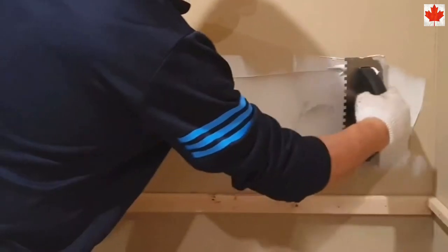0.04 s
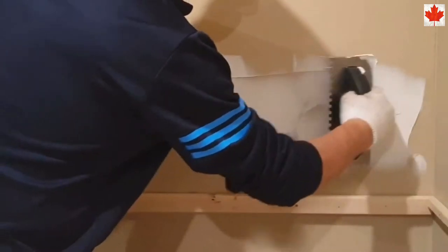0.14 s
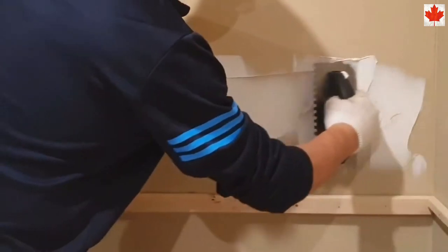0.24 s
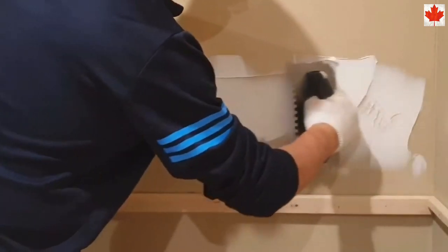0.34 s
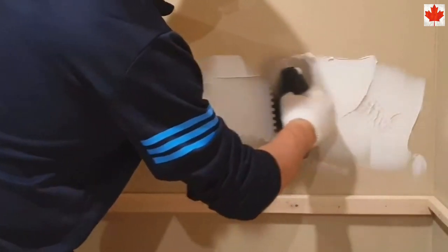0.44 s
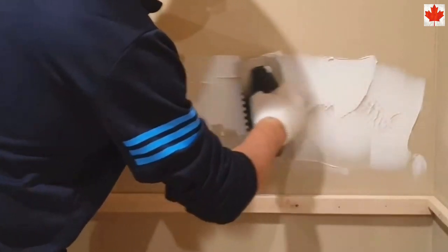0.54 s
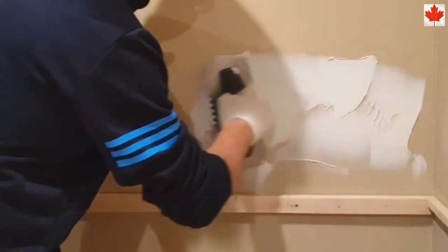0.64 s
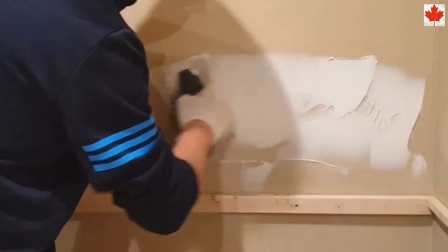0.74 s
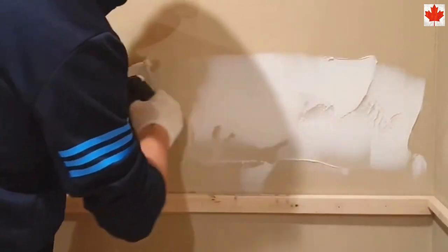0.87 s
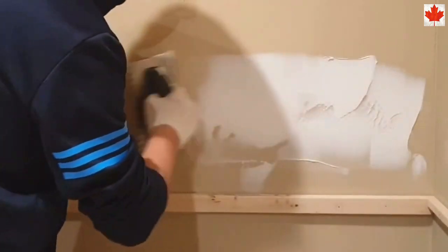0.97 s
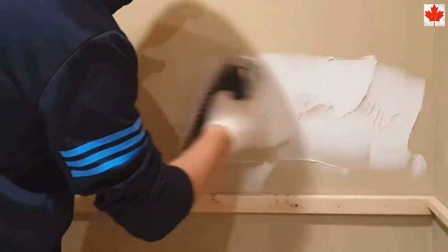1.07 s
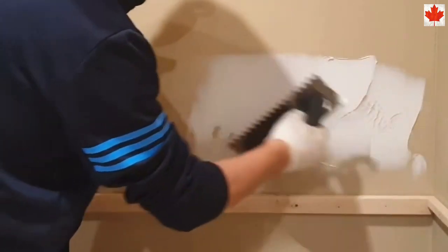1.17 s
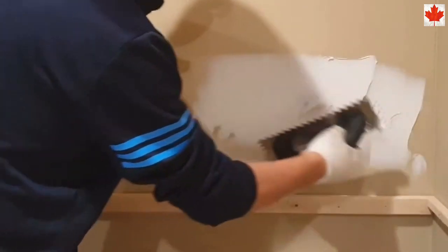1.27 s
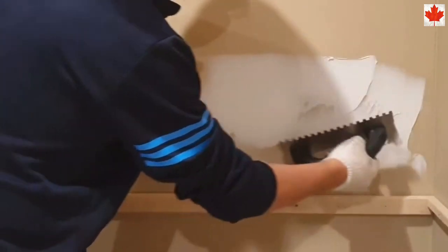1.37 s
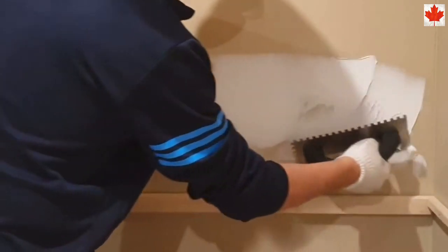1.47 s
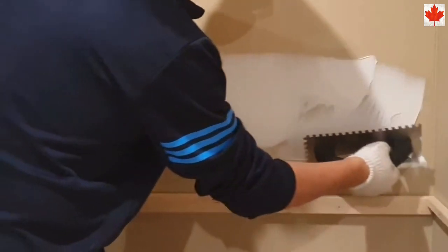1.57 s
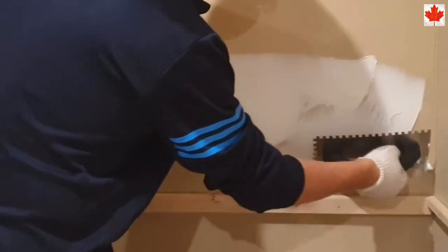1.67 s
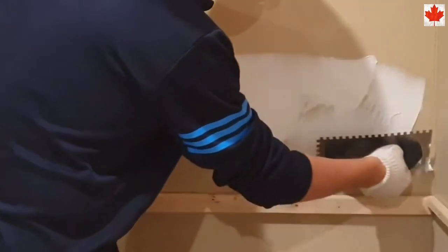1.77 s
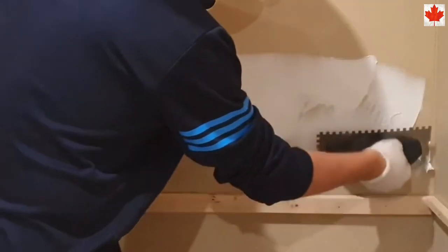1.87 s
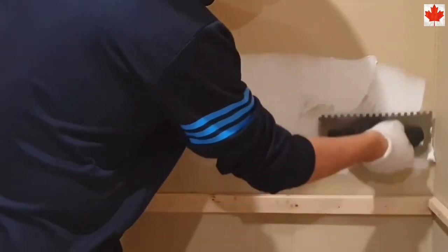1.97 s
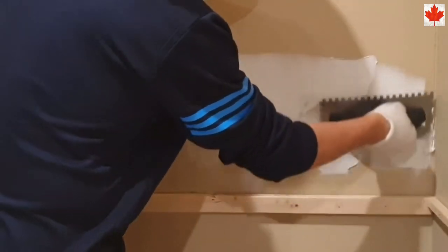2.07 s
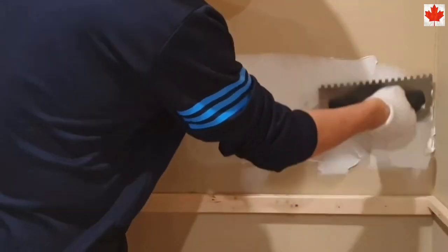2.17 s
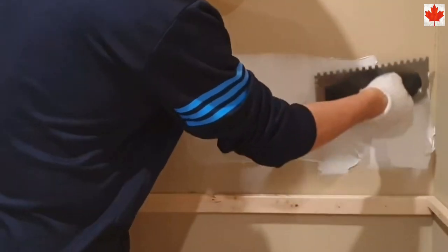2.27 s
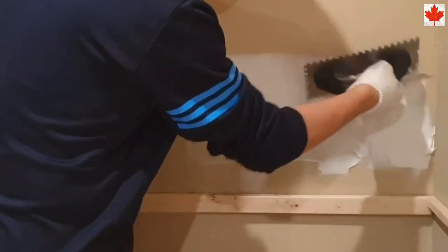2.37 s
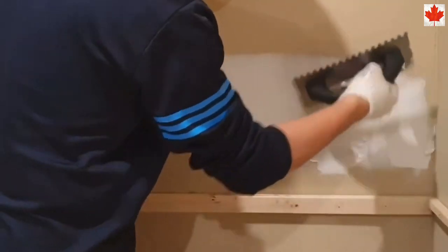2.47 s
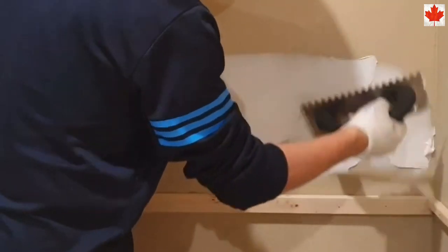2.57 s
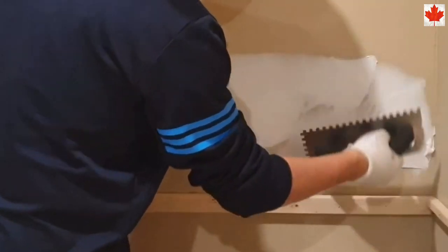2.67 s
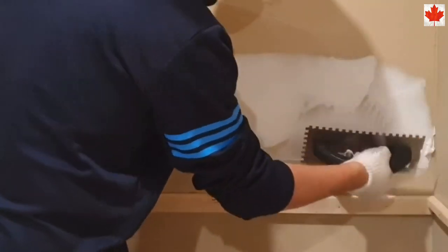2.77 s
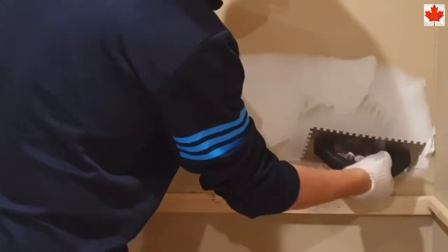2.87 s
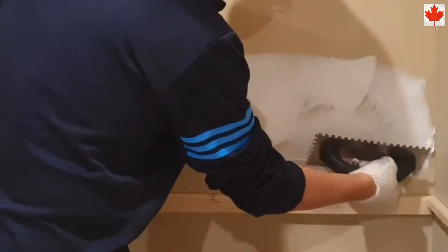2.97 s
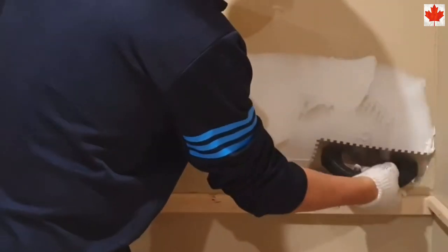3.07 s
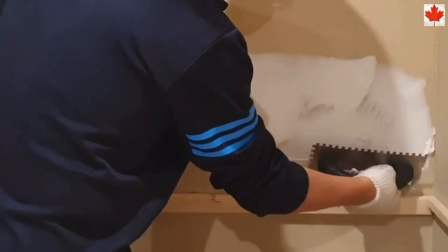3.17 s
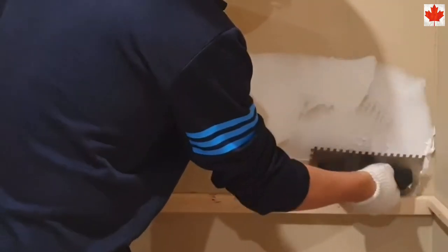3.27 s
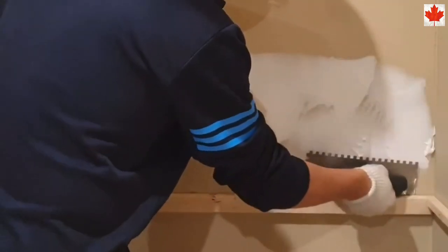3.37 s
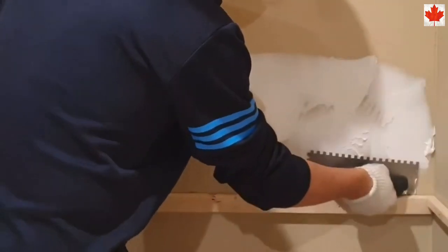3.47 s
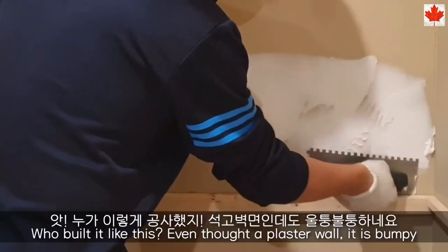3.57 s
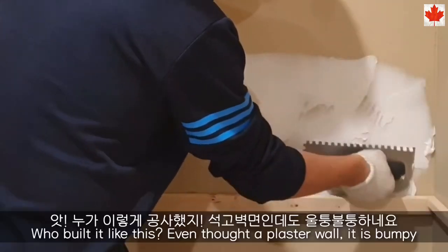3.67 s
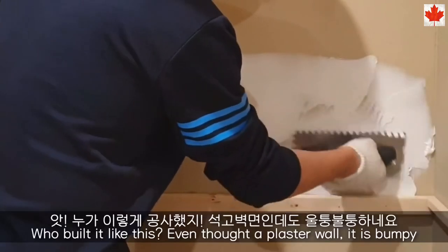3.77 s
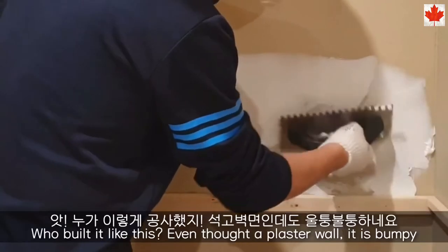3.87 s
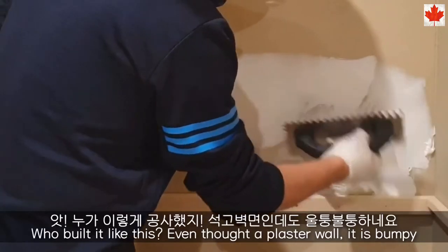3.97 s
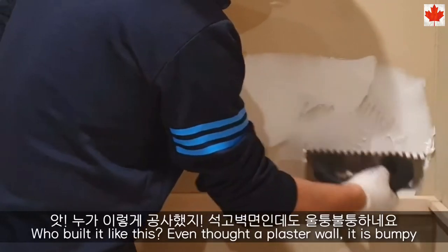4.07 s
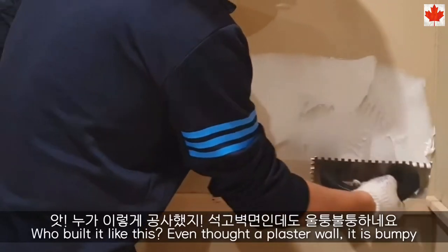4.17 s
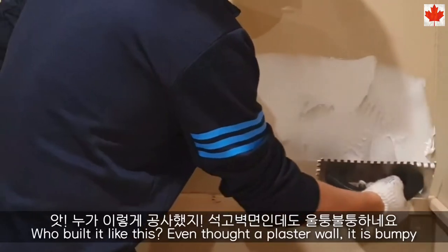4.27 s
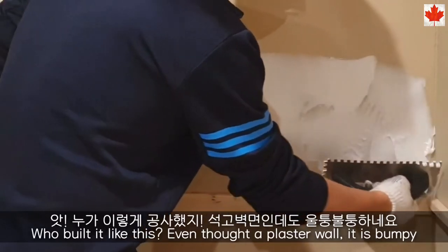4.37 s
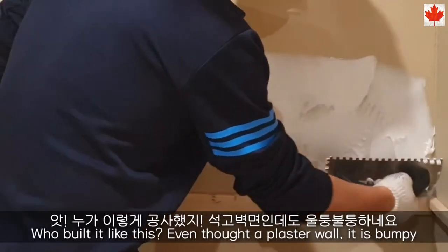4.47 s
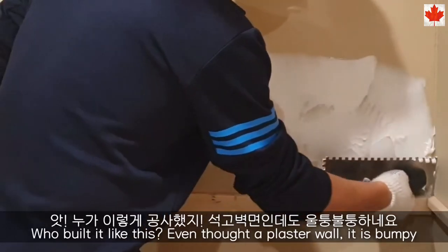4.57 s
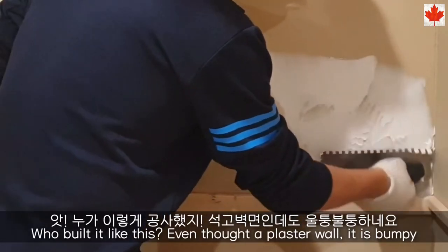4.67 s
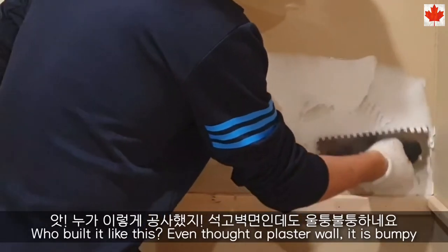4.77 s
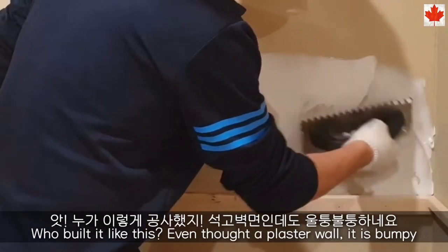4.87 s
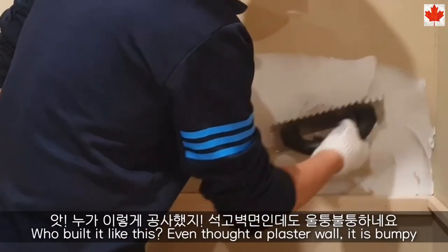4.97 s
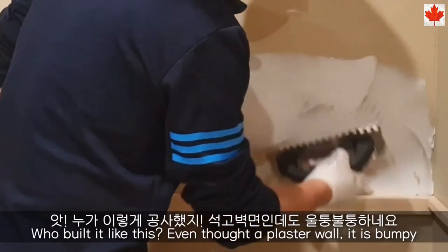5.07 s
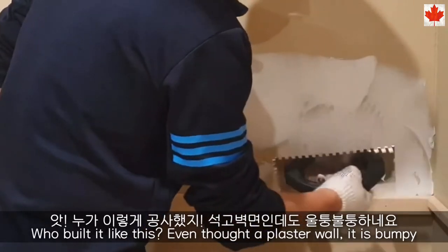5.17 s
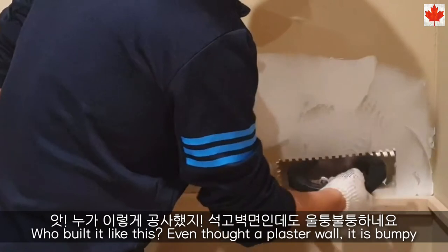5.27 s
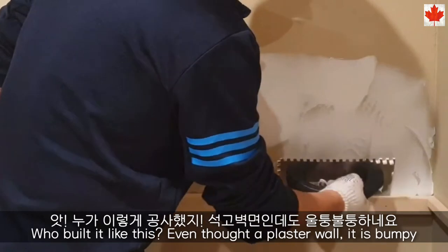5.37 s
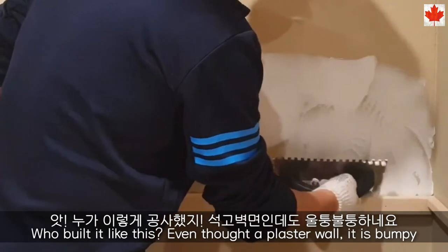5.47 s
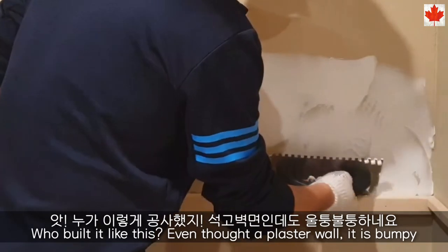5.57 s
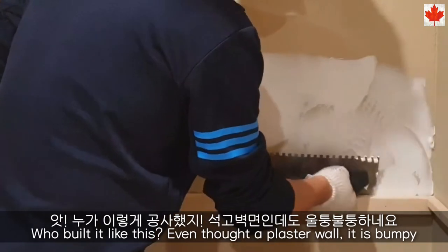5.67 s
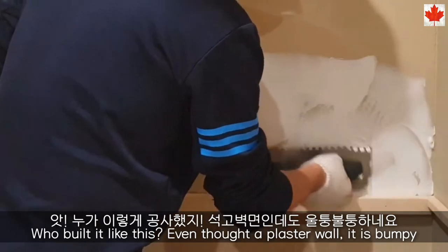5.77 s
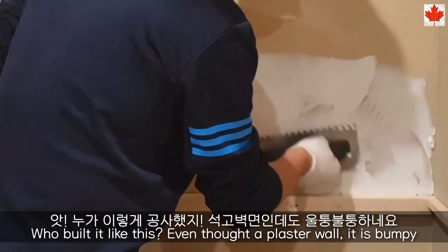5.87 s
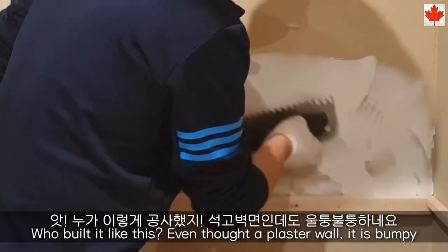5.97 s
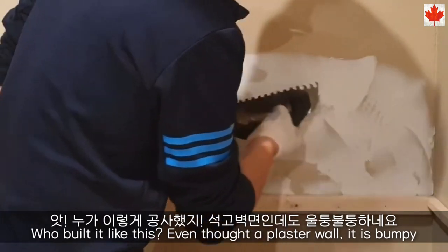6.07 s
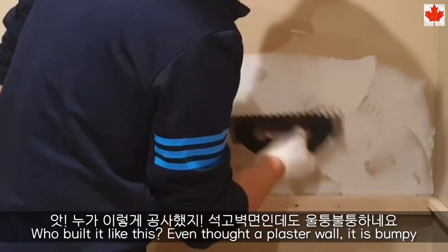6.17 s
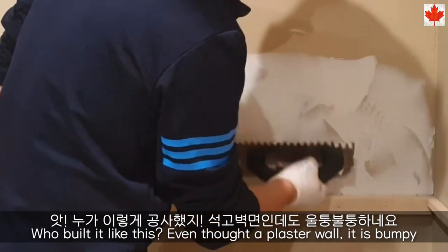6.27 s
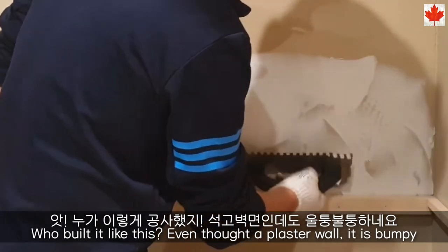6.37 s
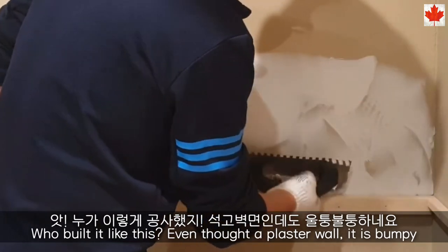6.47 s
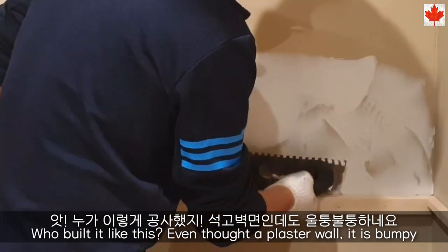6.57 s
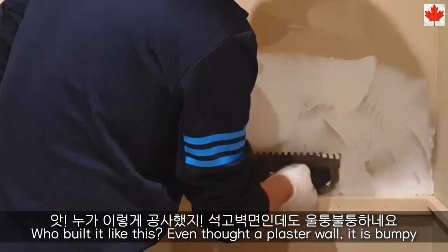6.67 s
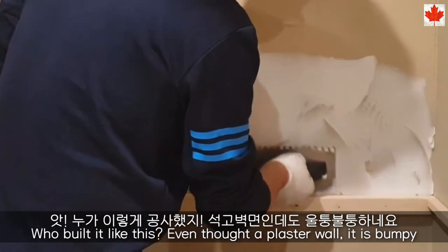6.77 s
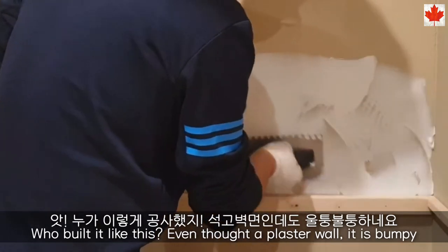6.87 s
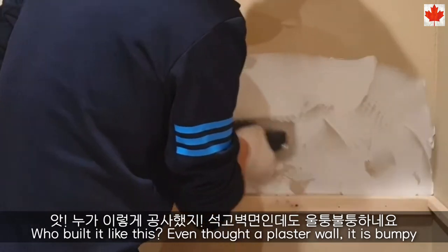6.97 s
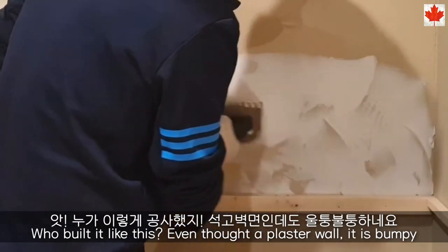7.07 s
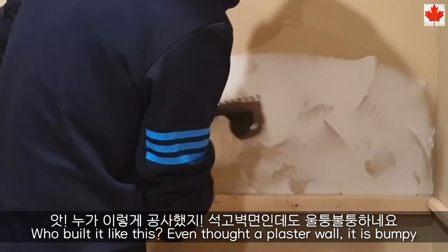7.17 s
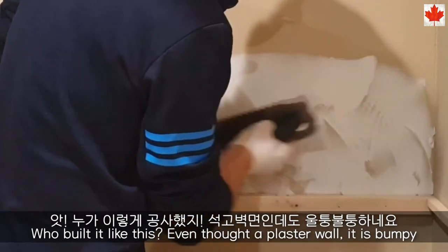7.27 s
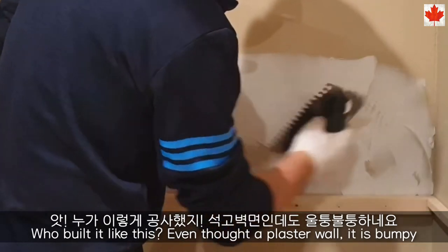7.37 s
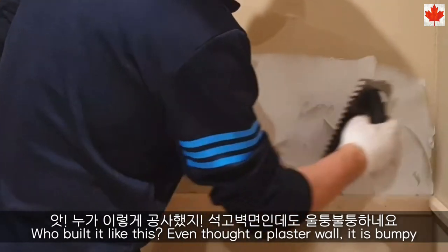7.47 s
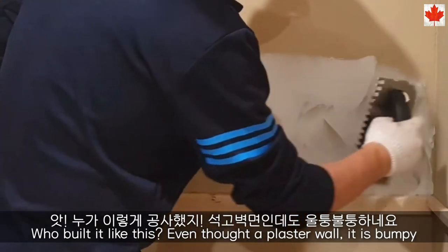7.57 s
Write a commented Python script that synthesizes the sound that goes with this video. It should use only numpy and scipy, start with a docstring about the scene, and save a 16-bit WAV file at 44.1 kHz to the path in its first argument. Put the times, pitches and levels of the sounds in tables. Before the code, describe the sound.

A metal blade lands, scrapes and peels off a wall coated with thick adhesive. Fizzy, sandy hiss mixes with a hollow mid-pitched steel rasp. Irregular bumps rattle the teeth and make the board thump deeply, strongest around the middle and later on. Tiny grain snaps and faint squeaks appear between strokes. Stereo microphones nearby catch short, bright indoor reflections and a quiet electrical hum.

```python
"""Trowel on a hollow wall

A notched steel trowel spreads thick adhesive over a bumpy plasterboard wall in a small room with mains hum.
Random clicks, shaped by filters, make the landing knocks, the hiss of gritty paste and the rasp of the edge.
On bumps the teeth judder: uneven slips ring the notes of the hollow wall, and filtered noise makes it boom.
Twice the steel squeaks faintly (narrow bands of noise), and now and then a hard grain snaps."""
import sys
import numpy as np
from scipy import signal
from scipy.fft import rfft, irfft, next_fast_len
from scipy.io import wavfile
from scipy.ndimage import uniform_filter1d

SR = 44100
rng = np.random.default_rng(int(sys.argv[2]) if len(sys.argv) > 2 else 0)


def unload_wav(signal):
    """Save mono or channel-first audio to the path in sys.argv[1] as 16-bit WAV at rate SR, clipped to [-1, 1]."""
    wavfile.write(
        sys.argv[1],
        SR,
        np.round(np.clip(np.atleast_2d(signal).T, -1, 1) * 32767).astype(np.int16),
    )


N = 336483
TIME = np.arange(N) / SR
AFTER = np.arange(SR) / SR  # seconds since a movement began
SIZE = next_fast_len(N + SR)  # room for filter tails
HZ = np.fft.rfftfreq(2 * (SIZE // 2), 1 / SR)


def amp(db):
    """Turns decibels into gain."""
    return 10 ** (np.asarray(db) / 20)


def unit(x):
    """Scales to an average (rms) size of 1."""
    return x / np.sqrt(np.mean(abs(x) ** 2) + 1e-20)


def read(points, hz=HZ):
    """Joins (frequency, value) points by straight lines on a log-frequency axis."""
    f, value = np.transpose(points)
    return np.interp(np.log(hz + 1), np.log(f), value)


def colour(points):
    """Builds a filter with the given dB outline that never sounds before its input."""
    cepstrum = irfft(np.log(amp(read(points))))
    half = len(cepstrum) // 2
    causal = np.r_[cepstrum[0], 2 * cepstrum[1:half], np.zeros(half)]
    return np.exp(rfft(causal))


def modes(rows):
    """Builds a filter from resonances, the notes at which an object likes to ring."""
    return sum(amp(db) * 1j * HZ * width / (hz ** 2 - HZ ** 2 + 1j * HZ * width)
               for hz, width, db in rows)


def through(x, response):
    """Passes a sound through a filter."""
    return irfft(rfft(x, 2 * (len(HZ) - 1)) * response)[..., :N]


def resonate(x, hz, width_hz):
    """A resonance of gain 1 whose note follows the curve hz."""
    turn = np.exp(2j * np.pi * np.cumsum(hz * np.ones(N)) / SR)
    r = np.exp(-np.pi * width_hz / SR)
    # shift the note down to zero, smooth, and shift back up
    smooth = signal.lfilter([1 - r], [1, -r], x / turn + 1e-18)
    return 2 * (turn * smooth).real


def wander(rate_hz):
    """A slow random curve of rms 1."""
    return unit(through(rng.standard_normal(N), 1 / (1 + (HZ / rate_hz) ** 4)))


def grains(per_s, spread_db):
    """Random clicks of either sign; a larger spread makes their sizes more uneven."""
    size = amp(spread_db * np.minimum(rng.exponential(1, N), 4))
    signed = size * rng.choice([-1, 1], N)
    return unit(signed * (rng.random(N) < per_s / SR))


def add(track, s, shape):
    """Adds a shape to a track from time s."""
    part = track[max(round(s * SR), 0):][:len(shape)]
    part += shape[:len(part)]


def envelope(attack_s, length_s, release_db_per_s, curve=1):
    """Attack, hold until length_s, then a steady fade in dB."""
    rise = np.minimum(AFTER / attack_s, 1) ** curve
    return rise * amp(-release_db_per_s * np.maximum(AFTER - length_s, 0))


# how alike left and right are in diffuse sound: (frequency [Hz], likeness [-1 to 1])
LEFT_RIGHT_LIKENESS = [(50, 0.59), (150, -0.41), (300, -0.63), (600, 0.29), (1200, -0.19), (3000, 0.0028),
                       (16000, 0.14)]


def pair(x):
    """Blends two unrelated signals into sound from all around, its left-right likeness set by frequency."""
    # alike in the deepest bass, partly opposite from about 150 to 300 Hz, mostly unrelated in the treble
    same = np.clip(read(LEFT_RIGHT_LIKENESS), -1, 1)
    common = through(x[0], np.sqrt((1 + same) / 2))
    apart = through(x[1], np.sqrt((1 - same) / 2))
    return np.array([common + apart, common - apart])


# colour of the still room: (frequency [Hz], relative level [dB])
ROOM_AIR = [(20, -34), (40, -12), (58, 0.5), (85, -3), (130, -16.5), (200, -11.5), (400, -22), (800, -28),
            (2500, -31), (6000, -33.5), (9000, -37.5), (13000, -30), (16000, -32.5)]
# steady mains hum: (frequency [Hz], level [dB])
MAINS_HUM = [(60, -79), (120, -62.5)]


def background(air_db=-70):
    """Low rumble and hiss of the room as filtered noise, with a steady mains hum of pure tones."""
    air = unit(through(pair(rng.standard_normal((2, N))), amp(read(ROOM_AIR))))
    hum = sum(amp(db) * np.sin(2 * np.pi * (hz * TIME + rng.random())) for hz, db in MAINS_HUM)
    return amp(air_db) * air + hum


# the teeth ride over a bump in the wall, levels before each sound's own gain:
# (start time [s], length [s], judder of the teeth [dB], thud of the board [dB], drumming of the hollow [dB])
WALL_BUMPS = [ (0.188, 0.022, -50.5, -41.5, -61.5), (0.232, 0.0077, -60, -47.5, -64),
              (0.281, 0.023, -49, -55.5, -61.5), (0.8, 0.046, -60, -63.5, -66.5),
              (0.931, 0.018, -49, -51.5, -60), (1.218, 0.022, -88, -61.5, -69.5),
              (1.656, 0.041, -69, -58.5, -71), (1.83, 0.071, -61.5, -48.5, -74),
              (2.227, 0.051, -66, -72, -85), (2.39, 0.013, -71, -73, -59), (3.244, 0.057, -68, -51, -76),
              (3.375, 0.028, -46.5, -34, -48.5), (3.474, 0.037, -79.5, -50, -68.5),
              (3.671, 0.048, -63, -47, -56), (3.733, 0.085, -79.5, -55, -73.5),
              (3.94, 0.014, -63, -48.5, -65), (4.424, .02, -52.5, -48.5, -52.5),
              (4.446, 0.095, -40.5, -35.5, -42.5), (4.531, 0.02, -34, -39.5, -34),
              (4.596, 0.029, -36.5, -37.5, -58), (4.637, 0.013, -63.5, -47.5, -57),
              (4.821, 0.015, -55, -67, -63), (4.914, 0.052, -61, -87, -91),
              (5.191, 0.052, -84, -58.5, -80.5), (5.554, 0.0194, -43.5, -44, -49),
              (5.572, 0.048, -41.5, -30, -35.5), (5.645, 0.038, -45.5, -30, -46.5),
              (6.036, 0.094, -85, -58, -70), (6.297, 0.11, -89, -60, -86),
              (6.614, 0.079, -59, -47.5, -59.5), (6.934, .18, -56.5, -52.5, -54)]
BUMP_ATTACK_S, JUDDER_RELEASE_DB_PER_S, THUD_RELEASE_DB_PER_S = 0.012, 335, 253.5


def bumps(pressure, chatter_db=-28, lean_db=-47, lean_growth=0.45):
    """Force on the teeth, push on the board and on the hollow behind: bumps drive all three, strokes the first two."""
    force = amp(chatter_db) * pressure
    push = amp(lean_db) * pressure ** lean_growth
    drum = np.zeros(N)
    for s, length_s, judder_db, thud_db, drum_db in WALL_BUMPS:
        shake = envelope(BUMP_ATTACK_S, length_s, JUDDER_RELEASE_DB_PER_S)
        flex = envelope(BUMP_ATTACK_S, length_s, THUD_RELEASE_DB_PER_S)
        add(force, s, amp(judder_db) * shake)
        add(push, s, amp(thud_db) * flex)
        add(drum, s, amp(drum_db) * flex)
    return force, push, drum


# colour of the slipping teeth: (frequency [Hz], relative level [dB])
JUDDER_COLOUR = [(30, -52.5), (70, -41.5), (160, 2.5), (480, 5.5), (700, -12.5), (1500, -21), (4000, -69),
                 (16000, -91.5)]
# notes of the hollow wall: (frequency [Hz], width [Hz], relative level [dB])
WALL_NOTES = [(96.3, 6.5, 16.5), (163.7, 19, 3), (183.6, 12, -3), (219.6, 17, 7), (276, 12, -3.5),
              (312, 3.9, 1), (402, 7.1, 4.5), (476, 16, -9), (477.4, 12, -0.5), (550, 16, -16.5)]
# its upper notes, reached by hard slips: (frequency [Hz], width [Hz], relative level [dB])
WALL_UPPER_NOTES = [(654, 9, 5), (695.4, 4, -3.5), (810, 7, 0), (997, 8.4, -0.5), (1195, 13, -9.5),
                    (1320, 14, -7), (1500, 15, -10.5), (1707, 14, -14)]


def judder(force, upper_db=-1, hard_db=-30, slip_hz=420, uneven=0.6):
    """The teeth stick and slip unevenly and drum the wall; hard slips reach its upper notes."""
    slip_rate = slip_hz * np.exp(uneven * wander(rate_hz=300))
    turns = np.floor(np.cumsum(slip_rate) / SR)
    # one click for each completed turn
    clicks = np.diff(turns, prepend=0) * rng.choice([-1, 1], N) * (0.5 + rng.random(N))
    slips = force * unit(clicks)
    hardness = np.minimum(force / amp(hard_db), 1) ** 0.81
    body = through(slips, unit(colour(JUDDER_COLOUR) + modes(WALL_NOTES)))
    upper = through(slips * hardness, unit(modes(WALL_UPPER_NOTES)))
    return body + amp(upper_db) * upper


# colour of the booming board: (frequency [Hz], relative level [dB])
BOARD_COLOUR = [(20, -39), (35, -23.5), (48, 5), (62, -5.5), (80, 2), (99, 3.5), (125, -8.5), (200, -31),
                (500, -55), (2000, -88)]


def board(push, level_db=-1, stiff_db=-44, sag_hz=66, yielding=1.0):
    """The whole board flexes and booms as it is pushed; pressed hard, it loses its deepest rumble."""
    boom = through(rng.standard_normal(N), colour(BOARD_COLOUR))
    # even out the noise so that the push alone sets the loudness
    boom = boom / np.sqrt(abs(uniform_filter1d(boom ** 2, size=1800)) + 1e-12)
    sag = through(boom, 1 / (1 + (HZ / sag_hz) ** 8))
    held = 1 - np.maximum(push / amp(stiff_db), 1) ** -yielding
    return amp(level_db) * push * (boom - held * sag)


def cavity(drum, centre_hz=185, width_hz=60):
    """Bumps also drum the low notes of the hollow behind the board: clicks ring its resonances."""
    hollow = modes(WALL_NOTES) * modes([(centre_hz, width_hz, 0)]) ** 2
    return through(drum * grains(per_s=1800, spread_db=2.0), unit(hollow))


# the blade lands, strikes a bump or flicks off, levels before the gains below:
# (time [s], clack level [dB], clack centre [Hz], thump of the board [dB], tick level [dB])
BLADE_KNOCKS = [(0.19, -39, 745, -41.5, -54.5), (1.632, -63, 814, -48, -69), (1.831, -46, 430, -46, -66.5),
                (2.159, -71.5, 2514, -72, -61), (3.002, -45, 428, -62.5, -105), (3.232, -57, 560, -56, -60),
                (3.371, -42, 1260, -35, -62), (3.937, -35.5, 1160, -59, -61), (4.533, -26.5, 312, -49, -68),
                (4.569, -26.5, 625, -49, -72), (4.584, -28, 375, -54, -74), (4.821, -49, 1370, -68, -59),
                (5.587, -37, 427, -29.5, -55), (5.619, -30.5, 224, -47.5, -72.5),
                (6.046, -60, 1420, -61, -31), (6.591, -59, 1250, -38.5, -69),
                (7.475, -59.5, 1820, -42, -42.5), (7.485, -45.5, 573, -45.5, -67)]
# colour of a clack: (frequency [Hz], relative level [dB])
CLACK_COLOUR = [(100, -14), (280, -3.5), (450, 0.5), (650, -3.5), (1000, 0.5), (2000, -3.5), (4000, -17),
                (16000, -59)]
# notes of the steel blade, damped by paste: (frequency [Hz], width [Hz], relative level [dB])
BLADE_NOTES = [(584, 27, 0), (840, 35, -7), (1178, 21, -2), (1364, 120, 6), (1476, 150, -9), (1807, 39, -1),
               (1870, 45, -5.5), (2350, 67, -24.5), (2390, 42, -10.5), (3220, 80, -11.5)]


def knocks(clack_db=4, thump_db=-1, settle_s=0.015, wall_db=1, sharpness=3.55, cushion_s=0.0068):
    """The teeth hit in a brief rattle of clicks: a clack of blade and wall, a thump and a bright tick."""
    clack, thump, tick = np.zeros((3, N))
    rattle = grains(per_s=3000, spread_db=-0.1)
    wall = modes(WALL_NOTES + WALL_UPPER_NOTES)
    struck = colour(CLACK_COLOUR) + modes(BLADE_NOTES) + amp(wall_db) * wall
    for s, hit_db, centre_hz, low_db, high_db in BLADE_KNOCKS:
        contact = rattle * np.clip((TIME - s) / cushion_s, 0, 1) * np.exp(-abs(TIME - s) / settle_s)
        # the more paste cushions the blow, the lower the notes it excites
        excited = modes([(centre_hz, centre_hz / sharpness, 0)])
        clack += amp(hit_db) * through(contact, unit(struck * excited))
        thump += amp(low_db) * contact
        tick += amp(high_db) * contact
    low = through(thump, unit(colour(BOARD_COLOUR)))
    bright = through(tick, unit(colour(PASTE_COLOUR)))
    return amp(clack_db) * clack + amp(thump_db) * low + bright


# the blade is drawn through the paste; its loudness swells, or sinks where the swell is negative:
# (start time [s], swell time [s], hold time [s], swell [dB], paste hiss before its gain [dB],
#  rasp of the steel edge before its gains [dB], note of the air wedge under the blade [Hz])
PASTE_DRAGS = [ (0.238, 0.027, 0.38, 15, -47.5, -56.5, 1610), (0.695, 0.0086, .05, -9, -42.5, -45.5, 1900),
               (0.743, .15, 0.035, 7.5, -33.5, -40.5, 1700), (1.602, 0.18, 0.041, 10, -76, -71, 1350),
               (1.82, 0.0029, 0.017, -2, -66, -62, 1322), (1.939, 0.0081, .012, 6, -61.5, -63, 1200),
               (2.154, .005, .04, 1, -63.5, -100, 2496), (2.211, 0.041, 0.15, 18, -54, -62.5, 2276),
               (3.004, .005, .07, 1, -93, -71, 1105), (3.237, 0.01, 0.0032, -1, -54, -55.5, 1620),
               (3.3, .05, .01, 3, -63, -59, 1890), (3.367, 0.043, 0.0025, 12.5, -46.5, -52, 1530),
               (3.653, 0.035, 0.13, 20.5, -59, -76, 1657), (3.814, 0.052, 0.014, 28, -39.5, -47.5, 1626),
               (4.426, 0.017, 0.057, 3, -58.5, -57, 1390), (4.55, 0.066, .006, 19, -52.5, -62.5, 1290),
               (4.731, .1, .015, 5.5, -57.5, -65, 1392), (4.868, 0.0062, 0.0092, 7, -34.5, -47.5, 1710),
               (5.549, 0.06, 0.05, -2, -61, -79.5, 1027), (5.669, 0.015, 0.01, 15, -43, -47.5, 1442),
               (5.87, 0.17, 0.027, 17.5, -41.5, -64, 1713), (6.586, 0.06, .012, 17.5, -55, -54, 1700),
               (6.676, 0.026, .01, 9, -48.5, -52, 1400), (6.78, 0.031, 0.081, 10, -60, -65.5, 1520),
               (6.872, 0.11, 0.094, 43, -37.5, -50.5, 1736), (7.471, 0.0045, 0.014, -1, -53, -49.5, 1847)]
DRAG_ATTACK_S, DRAG_RELEASE_DB_PER_S = 0.016, 253.5
RASP_GROWTH = 0.93  # share of the swell in dB that the rasp follows
# the blade flattens and peels off the paste, levels before each sound's own gain:
# (crest time [s], rise time [s], fade [dB per s], paste hiss [dB], rasp [dB],
#  wedge note [Hz], its sag [octaves], bite of the steel [dB])
BLADE_LIFTS = [ (0.918, .04, 185.5, -35.5, -34.5, 1200, .9, -46),
               (2.425, 0.061, 281.5, -46, -46.5, 1157, .7, -61),
               (3.948, .03, 281.5, -55, -47, 1100, .6, -73),
               (4.556, 0.023, 419.5, -72, -42.5, 900, 0.34, -68),
               (4.903, 0.017, 204, -39, -47.5, 2075, 0.17, -52.5),
               (6.057, .016, 184, -37.5, -44, 1750, .1, -43), (6.73, 0.035, 363, -47.5, -45, 1518, .4, -70),
               (7.101, 0.036, 182, -37, -39, 1750, .2, -63)]
PEEL_CURVE = 0.87  # shape of the rise to the crest: 1 is straight, more is steeper at the end
CLING_DB, CLING_DB_PER_S = -22.5, 105  # the edge rasps on faintly after the crest
SAG_LAG_S, SAG_WIDTH_S = 0.04, 0.03  # the wedge note sags just after each crest


def strokes():
    """Drag through paste, pressure on the edge and note of the air wedge; the stronger movement sets the note."""
    # movements add up as power, so these tracks hold squares
    drag, pressure, note = np.zeros((3, N))
    for s, swell_s, hold_s, swell_db, hiss_db, rasp_db, note_hz in PASTE_DRAGS:
        contact = envelope(DRAG_ATTACK_S, swell_s + hold_s, DRAG_RELEASE_DB_PER_S)
        speed = np.interp(AFTER, [0, swell_s], [amp(-swell_db), 1])
        rasp = (amp(rasp_db) * contact * speed ** RASP_GROWTH) ** 2
        add(drag, s, (amp(hiss_db) * contact * speed) ** 2)
        add(pressure, s, rasp)
        add(note, s, rasp * note_hz)
    for s, rise_s, fade_db_per_s, hiss_db, rasp_db, note_hz, sag_octaves, _ in BLADE_LIFTS:
        peel = envelope(rise_s, rise_s, fade_db_per_s, PEEL_CURVE)
        cling = amp(CLING_DB) * envelope(rise_s, rise_s, CLING_DB_PER_S)
        sag = sag_octaves * np.exp(-((AFTER - rise_s - SAG_LAG_S) / SAG_WIDTH_S) ** 2)
        rasp = (amp(rasp_db) * (peel + cling)) ** 2
        add(drag, s - rise_s, (amp(hiss_db) * peel) ** 2)
        add(pressure, s - rise_s, rasp)
        add(note, s - rise_s, rasp * note_hz / 2 ** sag)
    return np.sqrt(drag), np.sqrt(pressure), note / (pressure + 1e-30)


# colour of the gritty paste: (frequency [Hz], relative level [dB])
PASTE_COLOUR = [(200, -23.5), (800, -24.5), (1600, -15.5), (2800, -1), (4000, 2.5), (5000, 2.5), (7400, 5),
                (8200, -1), (12000, 0.5), (16000, -2.5)]


def paste(drag, level_db=0.5, clump_db=3.0, brighten=0.2, firm_db=-40):
    """Fine grit crackles under the teeth in clumps; a faster drag adds more fizz."""
    crackle = grains(per_s=14000, spread_db=0.0) * amp(clump_db * wander(rate_hz=100))
    grit = drag * unit(crackle)
    fizz = through(grit, 1 / (1 + (7800 / (HZ + 1)) ** 16))  # only the top of the treble
    grit = grit + fizz * ((drag / amp(firm_db)) ** brighten - 1)
    return amp(level_db) * through(grit, unit(colour(PASTE_COLOUR)))


# colour of the rasping edge: (frequency [Hz], relative level [dB])
EDGE_COLOUR = [(150, -40), (450, -21.5), (900, -0.5), (1400, -15.5), (2300, 1.5), (3500, -9.5),
               (6000, -20.5), (16000, -72)]


def edge(pressure, note_hz, level_db=-4, clump_db=1.4, wedge_db=-3, wedge_width_hz=950):
    """The steel edge catches on coarser grains, which ring the blade and the wedge of air beneath it."""
    catches = unit(grains(per_s=4000, spread_db=2.5) * amp(clump_db * wander(rate_hz=95)))
    once = resonate(catches, note_hz, wedge_width_hz)
    hollow = unit(resonate(once, note_hz, wedge_width_hz))
    steel = through(pressure * catches, unit(colour(EDGE_COLOUR) + modes(BLADE_NOTES)))
    return amp(level_db) * steel + amp(wedge_db) * pressure * hollow


# the blade's strongest bending note: (frequency [Hz], width [Hz], relative level [dB])
BITE_NOTE = [(1369, 56, 0)]


def bite(hold_s=0.018, release_db_per_s=300):
    """The edge digs in as the blade peels off, and the clicks set its strongest note ringing."""
    grip = np.zeros(N)
    for s, rise_s, *_, bite_db in BLADE_LIFTS:
        hold = envelope(rise_s, rise_s + hold_s, release_db_per_s, PEEL_CURVE)
        add(grip, s - rise_s, amp(bite_db) * hold)
    return through(grip * grains(per_s=2500, spread_db=2.0), unit(modes(BITE_NOTE)))


def follow(tables, axis):
    """Gain over time from one dB column of the tables; silent outside each one."""
    gain = 0
    for rows in tables:
        columns = np.array(rows)
        gain = gain + amp(np.interp(TIME, columns[:, 0], columns[:, axis], left=-200, right=-200))
    return gain


# faint dry squeaks, one list each: (time [s], level of the low note [dB], level of the overtones [dB])
FAINT_SQUEAKS = [
    [(2.52, -105, -76), (2.6, -100, -73.5), (2.7, -105, -96)],
    [(5.32, -100, -80), (5.37, -70.5, -64), (5.41, -64, -65.5), (5.44, -71, -72), (5.475, -93, -84),
     (5.51, -76, -79), (5.535, -75, -90), (5.56, -88, -97)],
]
# low note of a squeak: (frequency [Hz], width [Hz], relative level [dB])
SQUEAK_LOW_NOTE = [(1783, 42, 0)]
# overtones of a squeak: (frequency [Hz], width [Hz], relative level [dB])
SQUEAK_OVERTONES = [(2850, 50, -14), (3321, 40, -11), (5260, 30, 3), (5640, 200, -18), (7460, 110, -3)]


def squeak(rub_db=-7, flutter_db=3):
    """A corner of bare steel sings faintly on the wall over a dry rub; its overtones speak first."""
    note = unit(through(rng.standard_normal(N), modes(SQUEAK_LOW_NOTE)))
    overtones = unit(through(rng.standard_normal(N), modes(SQUEAK_OVERTONES)))
    rub = unit(through(rng.standard_normal(N), modes([(4540, 3900, 0)]) ** 2))
    overtones = overtones + amp(rub_db) * rub
    song = follow(FAINT_SQUEAKS, axis=1) * note + follow(FAINT_SQUEAKS, axis=2) * overtones
    return song * amp(flutter_db * wander(rate_hz=70))


# hard grains cracking under a tooth: (time [s], level [dB])
GRAIN_SNAPS = [(3.863, -15), (3.945, -17), (4.828, -37), (4.831, -20.5), (4.909, -41)]


def snaps(size_s=0.0002):
    """A hard grain bursts: noise that dies in a fraction of a millisecond, coloured like the paste."""
    force = sum(amp(db) * (TIME >= s) * np.exp(-abs(TIME - s) / size_s) for s, db in GRAIN_SNAPS)
    return through(force * rng.choice([-1, 1], N), unit(colour(PASTE_COLOUR)))


# time for the echoes to fall by 60 dB: (frequency [Hz], time [s])
ECHO_DECAY = [(100, 0.81), (260, 0.4), (700, 0.31), (1840, 0.35), (5000, 0.36), (9000, 0.33), (16000, 0.35)]


def echoes(first_s=0.001, corner=1.0, corner_s=0.045):
    """One spot on the wall heard in both ears: a burst from the near corner, then a tail dying band by band."""
    burst = 1 + corner * np.exp(-AFTER / corner_s)
    taps = rng.standard_normal((2, SR)) * (AFTER > first_s) * burst
    hz, t, z = signal.stft(taps, SR, nperseg=256)
    decay = amp(-60 * t / read(ECHO_DECAY, hz)[:, None])
    tail = signal.istft(z * decay, SR, nperseg=256)[1]
    return tail / np.linalg.norm(tail, axis=1, keepdims=True)


# strength of the echoes: (frequency [Hz], level over the direct sound [dB])
ECHO_STRENGTH = [(60, -9.5), (200, -16.5), (500, -1.5), (1500, 8.5), (6000, 6), (16000, 3.5)]


def room(x, lag_s=6e-5, spots_per_s=16, count=5):
    """Direct sound from slightly right, plus a few echo patterns that fade in and out in turn, over and over."""
    wetness = amp(read(ECHO_STRENGTH))
    direct = through(x, 1 / np.sqrt(1 + wetness ** 2 / 2))
    sent, wet = through(direct, wetness), 0
    for spot in range(count):
        nearness = np.sin(np.pi / 2 * np.minimum((TIME * spots_per_s + spot) % count, 2))
        wet = wet + signal.oaconvolve((sent * nearness)[None], echoes(), axes=1)[:, :N]
    left = through(direct, np.exp(-2j * np.pi * HZ * lag_s))  # arrives a little later
    return np.array([left, direct]) + pair(wet)


def scene():
    """All the sounds of the trowel in the room, over the background."""
    drag, pressure, note_hz = strokes()
    force, push, drum = bumps(pressure)
    wall = judder(force) + board(push) + cavity(drum)
    trowel = knocks() + paste(drag) + edge(pressure, note_hz) + bite() + squeak() + snaps()
    return room(trowel + wall) + background()


# tilt between the two microphones: (frequency [Hz], left minus right level [dB])
MICROPHONE_BALANCE = [(40, -3.5), (130, -1.3), (300, -0.5), (650, 1.5), (1400, 1.5), (5000, 1), (10000, -2),
                      (16000, 0)]


def record(dry, low_cut_hz=30, high_cut_hz=15900):
    """Two slightly unequal microphones, with the deepest bass and the highest treble cut away."""
    heard = through(dry, amp(np.outer([0.5, -0.5], read(MICROPHONE_BALANCE))))
    low_cut = signal.butter(3, low_cut_hz, "highpass", fs=SR, output="sos")
    heard = signal.sosfilt(low_cut, heard)
    high_cut = signal.firwin(511, high_cut_hz, window=("kaiser", 9), fs=SR)
    return signal.oaconvolve(heard, high_cut[None], "same")


dry = scene()
out = record(dry)
unload_wav(out)
```